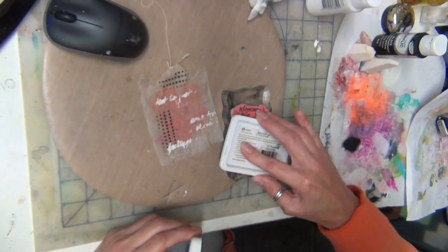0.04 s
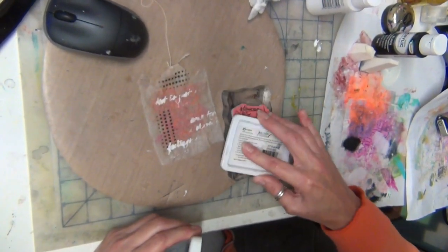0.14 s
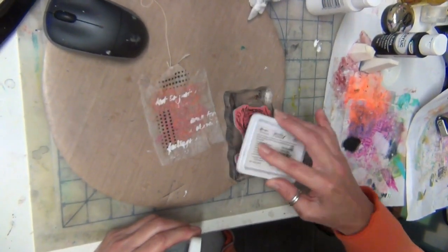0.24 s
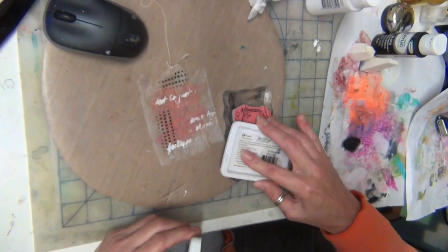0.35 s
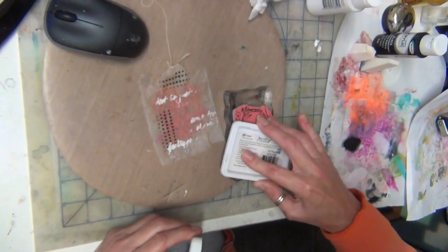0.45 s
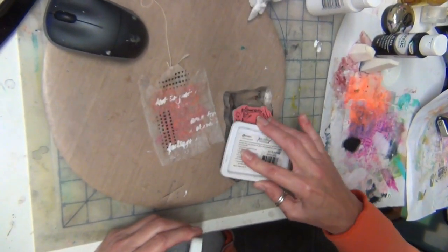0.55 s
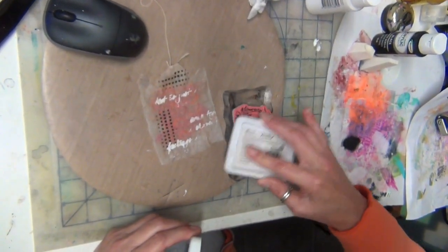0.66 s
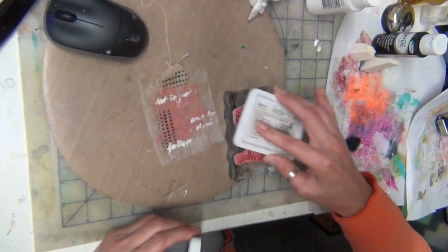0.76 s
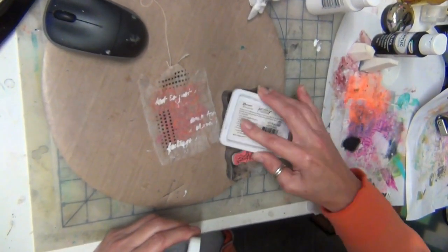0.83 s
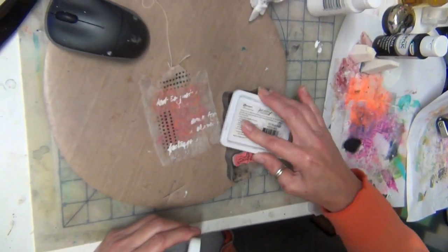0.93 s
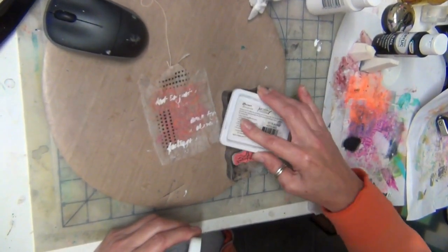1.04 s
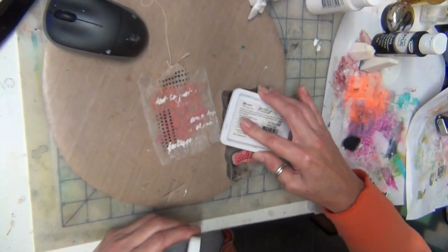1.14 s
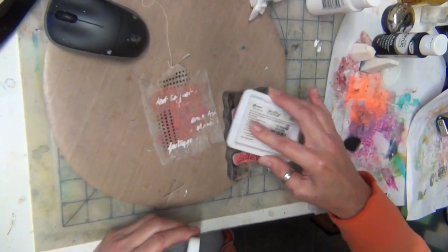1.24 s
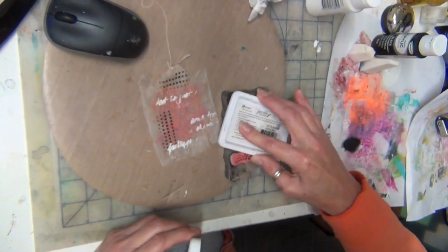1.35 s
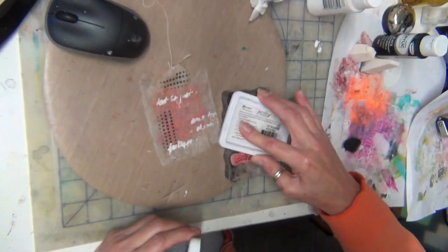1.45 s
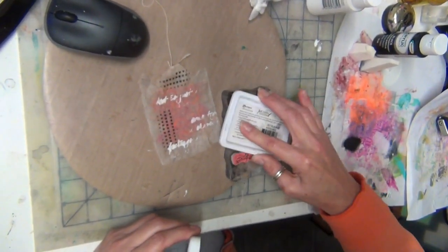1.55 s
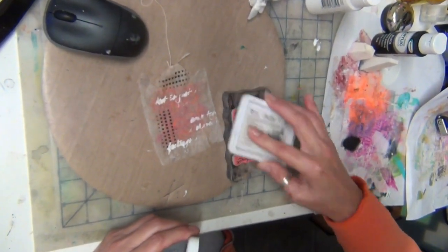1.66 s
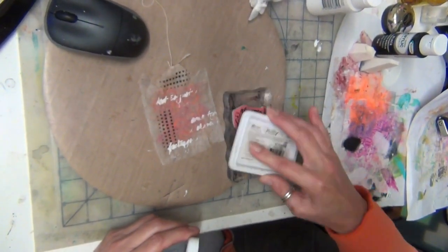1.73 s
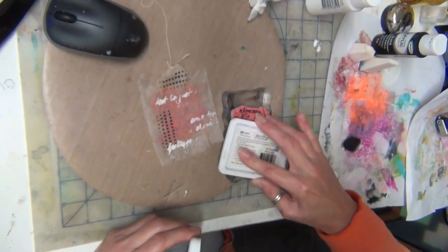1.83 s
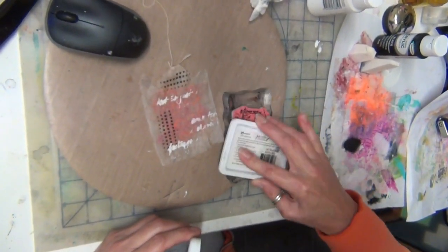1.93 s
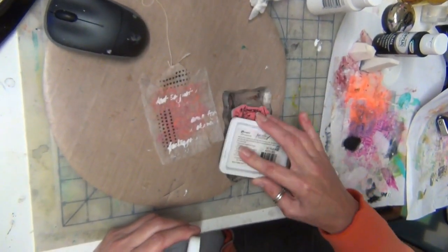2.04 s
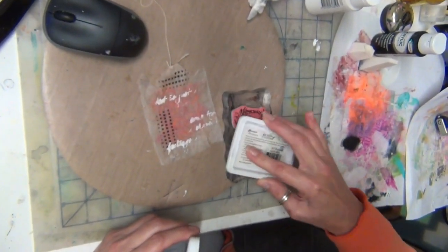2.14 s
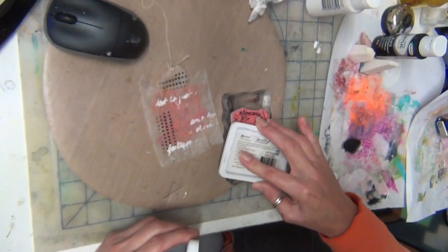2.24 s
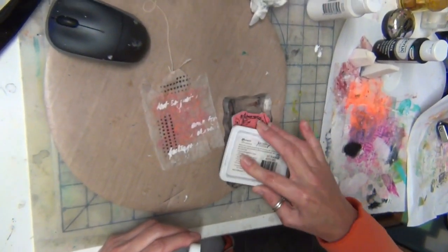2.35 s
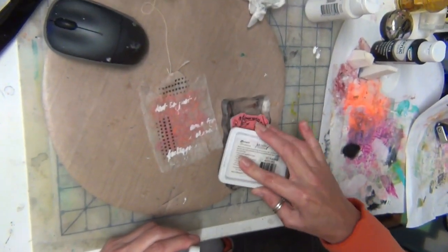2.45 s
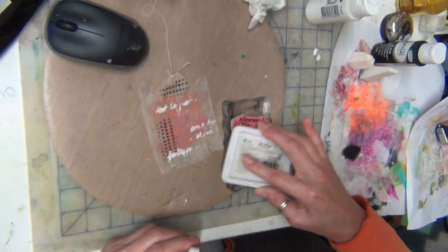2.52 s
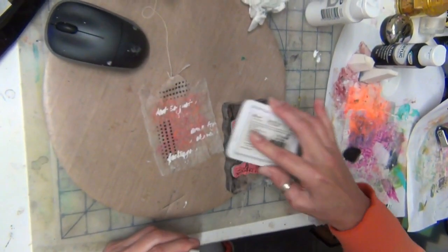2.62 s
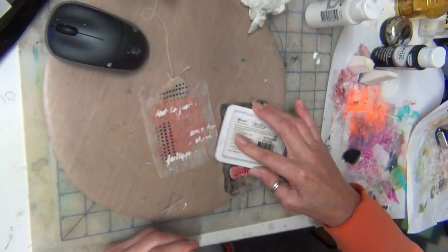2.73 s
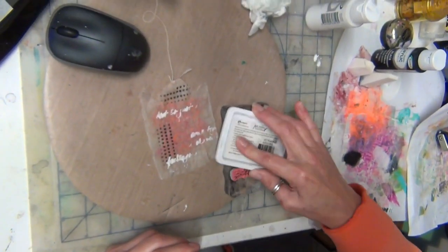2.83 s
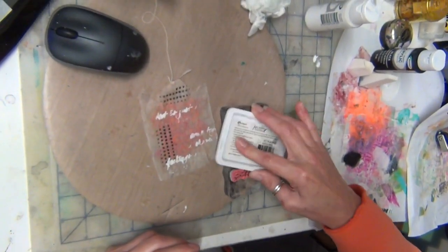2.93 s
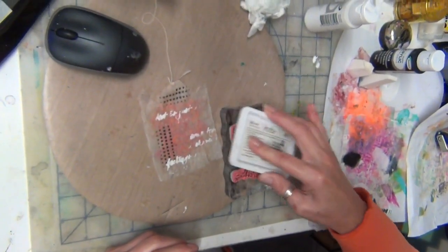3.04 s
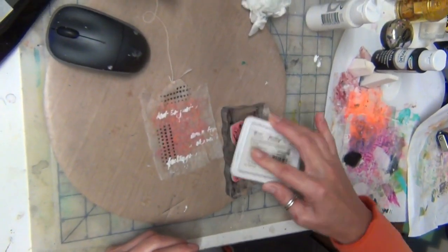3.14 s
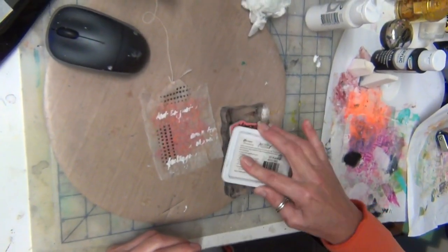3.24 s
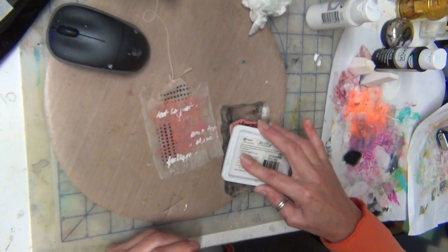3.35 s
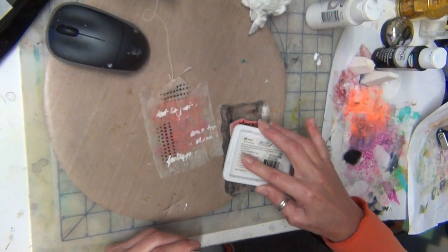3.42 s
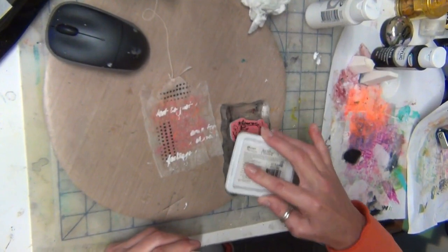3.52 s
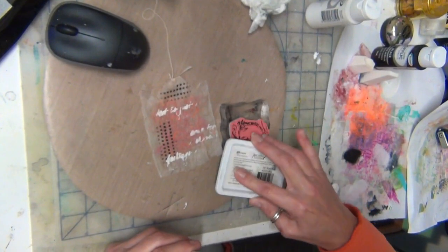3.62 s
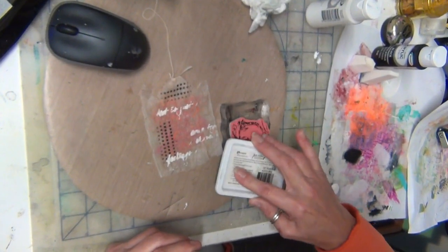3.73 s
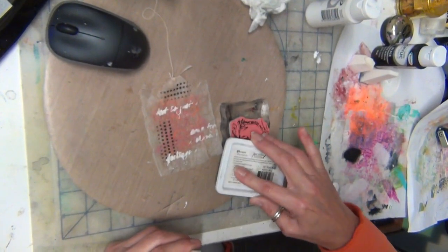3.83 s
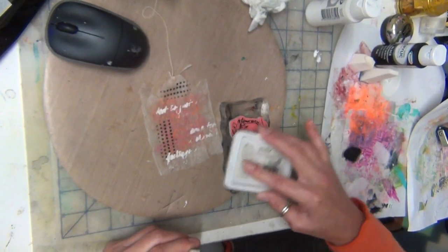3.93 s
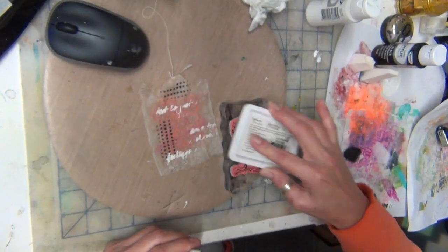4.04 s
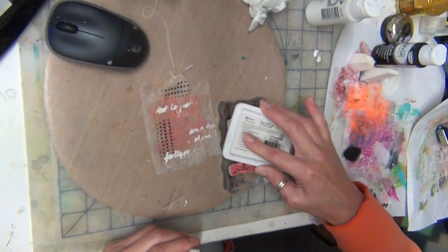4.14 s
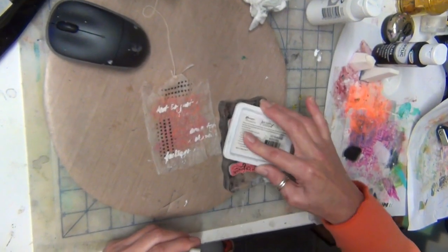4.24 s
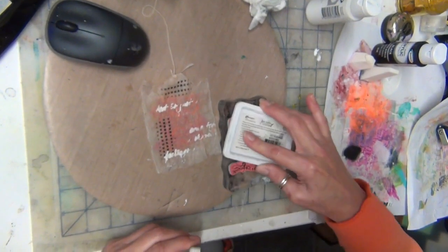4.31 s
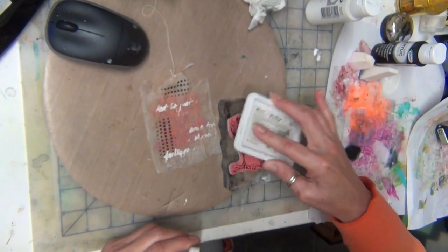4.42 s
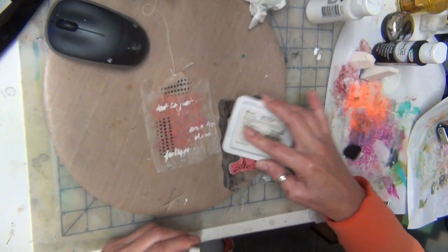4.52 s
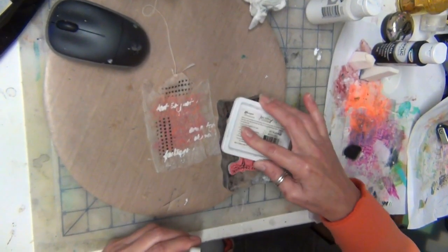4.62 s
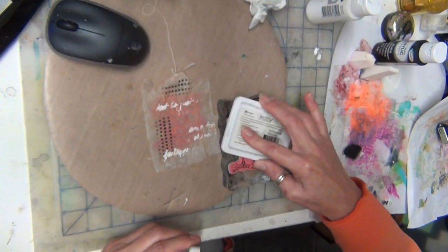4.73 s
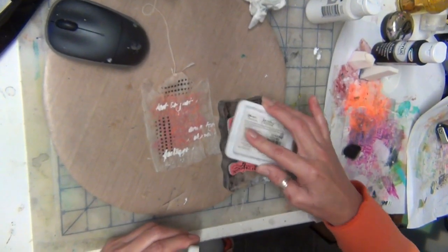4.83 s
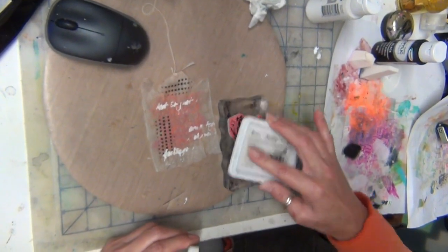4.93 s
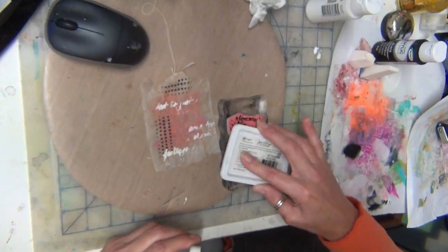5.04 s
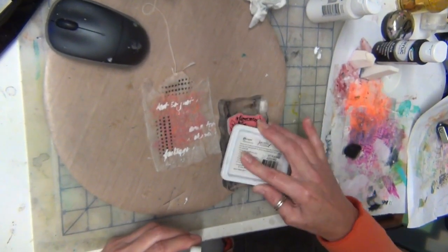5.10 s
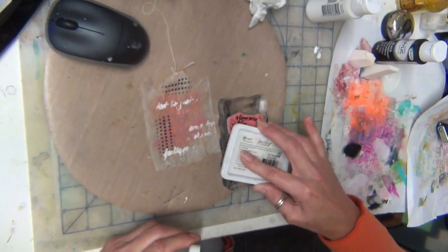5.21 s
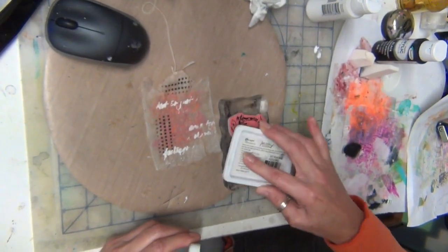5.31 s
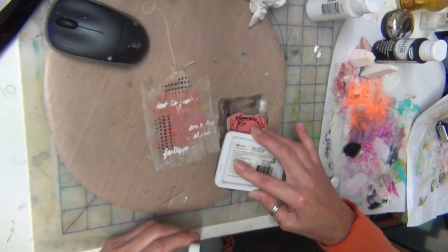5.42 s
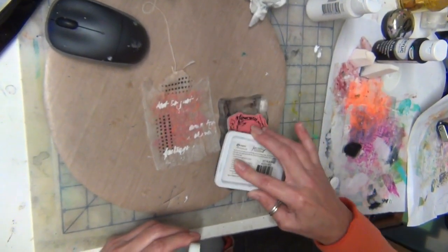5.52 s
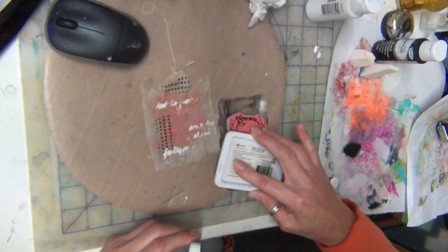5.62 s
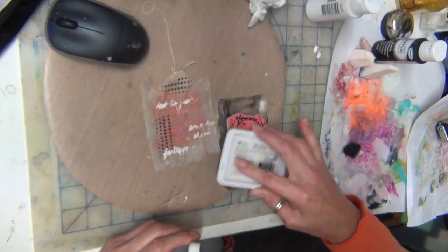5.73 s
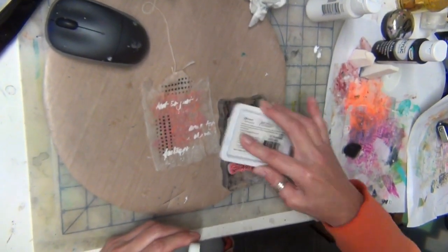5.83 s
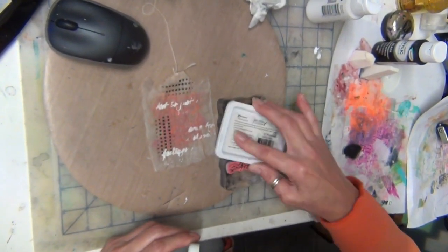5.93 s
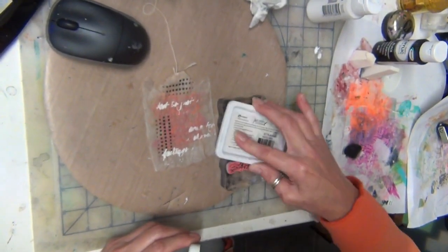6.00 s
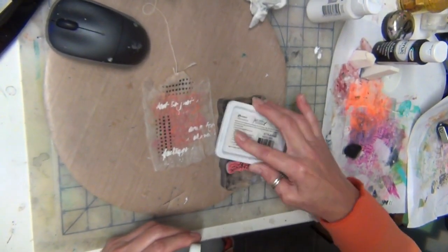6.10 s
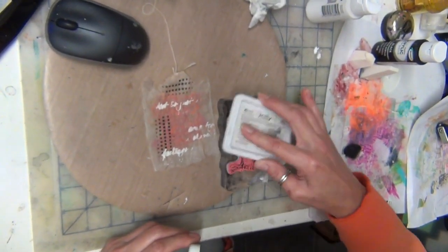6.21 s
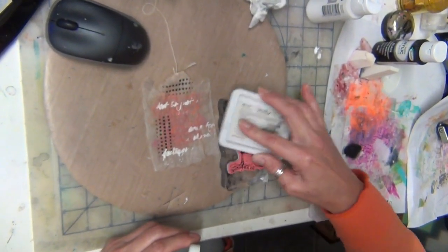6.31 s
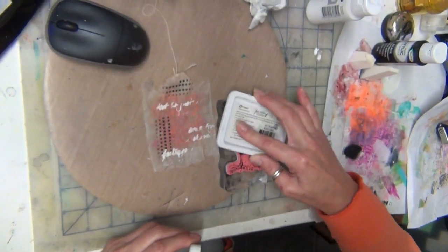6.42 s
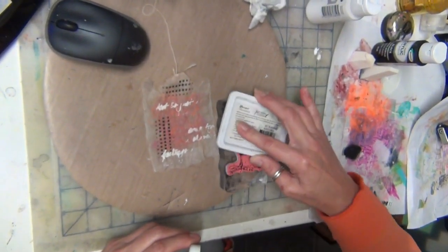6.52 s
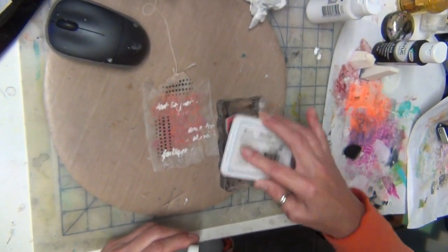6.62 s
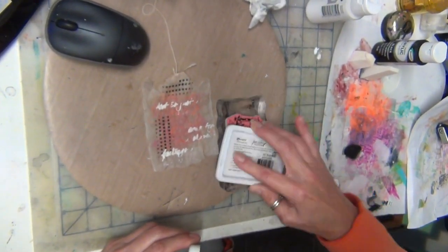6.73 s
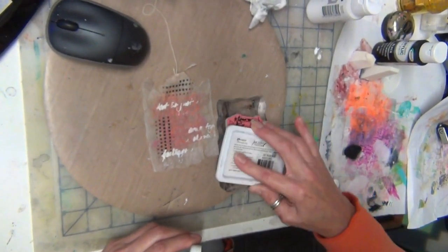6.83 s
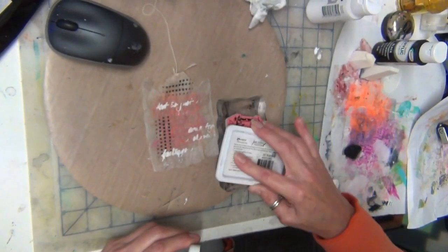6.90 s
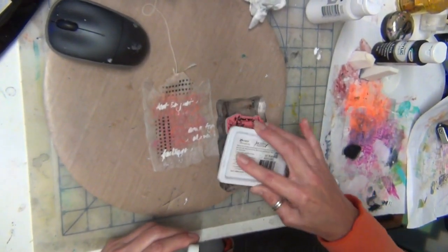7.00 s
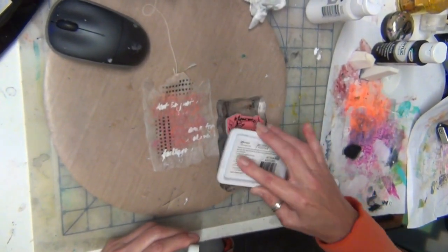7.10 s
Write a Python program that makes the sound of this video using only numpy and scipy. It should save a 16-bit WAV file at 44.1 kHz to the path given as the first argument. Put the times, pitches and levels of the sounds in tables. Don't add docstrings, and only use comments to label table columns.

```python
import sys
import numpy as np
from scipy import signal
from scipy.fft import rfft, irfft, next_fast_len
from scipy.io import wavfile
from scipy.ndimage import uniform_filter1d

SR = 44100
rng = np.random.default_rng(int(sys.argv[2]) if len(sys.argv) > 2 else 0)


def gain_from_db(level_db):
    decades = np.asarray(level_db, float) / 20
    return 10 ** decades


def log_audio(samples):
    frames = np.atleast_2d(samples).T
    limited = np.clip(frames, -1, 1)
    pcm = np.round(limited * 32767).astype(np.int16)
    wavfile.write(sys.argv[1], SR, pcm)


N = 315748
SIZE = next_fast_len(N)
SETTLE_MS = 34

# t/s, table thump/dB, squelch/dB, squelch length/ms, mat thud/dB
DABS = [(0.398, -36.5, -28, 4.7, -39), (0.898, -34.5, -42, 20, -41), (1.373, -31.5, -30.5, 6.3, -40),
        (1.861, -30.5, -28.5, 5.5, -38), (2.287, -30, -29.5, 7.9, -36.5), (2.759, -35, -28.5, 6.1, -31.5),
        (3.264, -32, -32, 12, -38), (3.667, -37, -27.5, 6.9, -34), (4.1431, -33.5, -32.5, 13, -37.5),
        (4.598, -39.5, -32, 8.2, -38.5), (5.073, -31, -23, 7.4, -42), (5.48, -32, -18.5, 2.9, -36),
        (5.943, -32, -38, 6.1, -45), (6.362, -33.5, -51, 9.3, -36.5), (6.787, -39, -36, 7.8, -35.5)]


def ring(modes, seconds):
    t = np.arange(int(seconds * SR))[:, None] / SR
    hz, db, t60 = np.transpose(modes)
    decay = np.exp(-np.log(1000) * t / t60)
    return (gain_from_db(db) * np.sin(2 * np.pi * hz * t) * decay).sum(axis=1)


def add(out, s, sound, db):
    i = int(s * SR)
    out[i:i + len(sound)] += (sound * gain_from_db(db) / np.abs(sound).max())[:N - i]


def band(x, lo_hz, hi_hz):
    edges_hz = [lo_hz, min(hi_hz, SR / 2.2)]
    return signal.sosfilt(signal.butter(2, edges_hz, "band", fs=SR, output="sos"), x)


def colour(x, points):
    hz = np.arange(SIZE // 2 + 1) * SR / SIZE + 1
    point_hz, point_db = np.array(points).T
    gain = gain_from_db(np.interp(np.log(hz), np.log(point_hz), point_db))
    return irfft(rfft(x, SIZE) * gain, SIZE)[..., :N]


def puff(noise, rise_ms, fall_ms):
    ms = np.arange(len(noise)) * 1000 / SR
    return noise * (1 - np.exp(-ms / rise_ms)) * np.exp(-ms / fall_ms)


def push(sound, ms):
    return signal.fftconvolve(sound, np.hanning(int(ms * SR / 1000) + 3))[:len(sound)]


def settle(size, at_ms):
    ms = np.arange(size) * 1000 / SR
    return gain_from_db(-9 / (1 + np.exp((at_ms - ms) / 2.5)))


def hush():
    # f/Hz, level/dB per Hz
    spectrum = [(15, -45), (25, -15), (48, -5), (108, -12), (137, -16.5), (161, -9.5), (309, -14.5),
                (344, -13), (451, -12.5), (624, -11), (677, -12), (962, -10), (1070, -14.5), (1740, -17.5),
                (9000, -31.5), (16000, -32.5)]
    # f/Hz, width/Hz, level/dB
    housing = [(57, 45, 3), (103.2, 12.5, 10), (629, 33, 8.5), (886, 170, 3.5), (1270, 170, 4.5),
               (1750, 326, 8.5), (5000, 1300, -0.5)]
    hz = np.arange(SIZE // 2 + 1) * SR / SIZE
    bumps_db = sum(db / (1 + (2 * (hz - centre) / width) ** 2) for centre, width, db in housing)
    noise = colour(rng.standard_normal((2, N)), spectrum)
    x = irfft(rfft(noise, SIZE) * gain_from_db(bumps_db), SIZE)[:, :N]
    return x * gain_from_db(-60) / x[0].std()


def scan_whine():
    return gain_from_db(-94) * np.sin(2 * np.pi * 15625 * np.arange(N) / SR)


def drum():
    # t/ms, f/Hz, level/dB, t60/s
    ticks = [(7.8, 3000, -64, .006), (7.9, 2500, -63, .018), (8.6, 1630, -60, .022), (7.9, 4760, -76, .02),
             (8.2, 970, -74, .03), (12.5, 1520, -71, .05), (27.8, 3200, -69, .004), (28.5, 1420, -64, .03),
             (28.6, 1720, -67, .04), (28.6, 1240, -72, .05), (35, 1580, -71, .03)]
    # t/ms, length/ms, f/Hz, level/dB
    whines = [(11, 8, 2350, -75), (11, 8.5, 3500, -77), (19, 11, 2450, -66), (19, 12, 4930, -79)]
    turn_hz = 25
    size = SR // turn_hz
    turn = np.zeros(2 * size)
    for ms, hz, db, t60 in ticks:
        add(turn, ms / 1000, push(ring([(hz, 0, t60)], 1 / turn_hz), 0.14), db)
    for ms, length_ms, hz, db in whines:
        i = np.arange(int(length_ms * SR / 1000))
        add(turn, ms / 1000, np.sin(2 * np.pi * hz * i / SR) * np.hanning(len(i)) ** 0.071, db)
    turn = turn[:size] + turn[size:]
    turns = np.arange(N // size + 1)
    gains = (-1.) ** turns * gain_from_db(3.1 * rng.standard_normal(len(turns)))
    return np.outer(gains, turn).ravel()[:N]


def walls(x):
    # t/ms, level/dB
    reflections = [(8.2, -12), (16.2, -28), (19.5, -24), (26.5, -24.5)]
    taps = np.zeros(1500)
    for ms, db in reflections:
        taps[int(ms * SR / 1000)] = gain_from_db(db)
    return band(signal.oaconvolve(x, taps)[:N], 157, 1500)


def echoes(x):
    # f/Hz, level/dB, t60/s
    room = [(159, -29, 0.34), (420, -31, 0.18), (730, -26.5, 0.31), (1500, -18.5, 0.043), (3020, -19, 0.27),
            (5470, -45, 0.16), (10200, -14, 0.24)]
    places, place_s = 5, .2345
    t = np.arange(int(.45 * SR)) / SR
    tails = np.zeros((places, 2, len(t)))
    for hz, db, t60 in room:
        fall = np.exp(-np.log(1000) * t / t60) * np.clip(t / 0.00016, 0, 1)
        noise = band(rng.standard_normal(tails.shape), 0.76 * hz, 2.11 * hz)
        level = gain_from_db(db) / np.sqrt(t60 * SR / 14) * np.sqrt(SR / 2.3 / hz)
        tails += level * noise * fall
    place = (np.arange(N) / SR // place_s) % places
    return sum(signal.oaconvolve((x * (place == k))[None], tail, axes=1)[:, :N]
               for k, tail in enumerate(tails))


def threads():
    # t/s, level/dB, f/Hz
    breaks = [(1.6216, -52, 7800), (3.0294, -71, 6750), (3.482, -59, 6200), (3.5044, -58, 5940),
              (3.7684, -53, 6200), (3.921, -53, 7590), (4.4966, -51, 6500), (5.301, -59, 5000),
              (5.7329, -56, 9400), (5.7484, -61, 7050), (5.7594, -62, 8300), (5.8154, -60, 6720),
              (6.1856, -54, 7770), (6.571, -47.5, 7800), (6.5844, -58, 9730), (7.013, -52, 6700),
              (.636, -59, 6400), (1.174, -53, 7770), (2.1121, -45, 7400), (.1772, -51, 7500),
              (2.5108, -50.5, 3260), (2.542, -59, 9000), (2.545, -59, 7500), (4.8472, -51, 9400),
              (4.8545, -60, 6170), (4.857, -53, 8000)]
    out = np.zeros(N)
    for s, db, hz in breaks:
        noise = rng.standard_normal(300)
        add(out, s, band(puff(noise, 0.24, 0.83), 0.74 * hz, 1.22 * hz), db + .1)
    return out


def peels():
    # t/s, length/ms, level/dB
    crackles = [(1.62, 54, -67), (3.0, 56, -68), (3.468, 53, -64.5), (3.91, 34, -62), (4.479, 30, -70),
                (5.29, 41, -68), (5.71, 130, -65.5), (6.169, 54, -68), (6.566, 56, -65), (6.9, 130, -62.5)]
    out = np.zeros(N)
    for s, ms, db in crackles:
        noise = rng.standard_normal((2, 7000))
        size = min(int(ms * SR / 1000), 7000)
        grains = noise[0] * gain_from_db(60 * uniform_filter1d(noise[1], size=60))
        add(out, s, band(grains, 3300, 10600)[:size] * np.hanning(size) ** .5, db + 10.0)
    return out


def snaps():
    # t/s, level/dB, treble/dB
    releases = [
        (0.187, -36.5, 13.5),
        (0.6568, -37, 12),
        (1.1804, -37.5, 12.5),
        (2.116, -37.5, 9.5),
        (4.8697, -33, 15),
    ]
    # f/Hz, level/dB, t60/s
    case = [(966, -8, 0.07), (1265, -7, 0.022), (1900, -15, 0.02), (2330, -1, 0.014), (3050, -4, 0.011),
            (3950, -8, 0.011), (4404, -14, 0.009), (5308, -16, 0.007), (6546, -15, .007)]
    # f/Hz, level/dB, t60/s
    lip = [(10460, -17, 0.0057), (13000, -14, .006)]
    out = np.zeros(N)
    t = np.arange(500) / SR
    turns = np.cumsum(1050 + 4500 * np.exp(-t / 0.001044)) / SR
    sweep = np.sin(2 * np.pi * turns) + 1.6 * np.sin(2 * np.pi * 1.5 * turns)
    sweep *= (1 - np.exp(-t / 0.00029)) * np.exp(-t / 0.0018)
    for s, db, treble_db in releases:
        noise = rng.standard_normal(700)
        rough = 1 + 0.078 * uniform_filter1d(noise, size=9)[:500]
        add(out, s + .0001, sweep * rough, db - 0.5)
        for hz, mode_db, t60 in case:
            add(out, s + 1.6 / hz, ring([(hz, 0, t60)], .09), db + mode_db - 2.0)
        add(out, s + .0001, band(puff(noise, 0.1, 1.2), 1400, 4600), db - 12)
        add(out, s + .0004, band(ring([(5600, 0, .0016)], .01), 3200, 9400), db + treble_db - 8)
        add(out, s + .0011, ring(lip, .02), db + treble_db - 20)
        add(out, s + .0006, band(puff(noise, 0.3, 2.2), 5500, 13000), db + treble_db - 17)
    return out


def spits():
    # t/s, level/dB, f/Hz
    cracks = [(0.3987, -47, 6500), (0.4018, -46, 6900), (0.4036, -45, 5700), (0.4054, -34, 5900),
              (0.9007, -46, 5700), (0.9023, -44, 6800), (0.9056, -40, 6400), (0.9087, -39.5, 6300),
              (1.3742, -40, 5900), (1.378, -46, 5830), (1.3828, -50, 6400), (1.3933, -41.5, 6500),
              (1.8646, -36, 7200), (1.8679, -31, 6700), (1.87, -41, 6400), (1.8715, -41, 5900),
              (2.2907, -38, 6800), (2.2929, -38, 6800), (2.2972, -39, 6300), (2.2993, -47, 5700),
              (2.7613, -46, 6300), (2.7645, -38, 7100), (2.7669, -34.5, 5500), (2.7692, -34.5, 7000),
              (3.2684, -44, 6700), (3.2706, -46, 5600), (3.2723, -34.5, 5160), (3.2765, -45, 6400),
              (3.6669, -43, 7400), (3.6697, -34.5, 7000), (3.6717, -41, 6700), (3.6758, -39, 5700),
              (4.1437, -45, 5500), (4.1456, -44, 6400), (4.1502, -48, 6800), (4.1518, -38, 6000),
              (4.6006, -42, 5800), (4.6071, -40, 7600), (4.6089, -34, 6100), (4.6109, -39, 7400),
              (5.0766, -46, 6300), (5.078, -47, 7100), (5.0794, -28.5, 6250), (5.0834, -45, 5800),
              (5.4817, -33, 7900), (5.4835, -37, 8000), (5.4868, -42, 5600), (5.4891, -32, 5700),
              (5.9477, -38, 8200), (5.9501, -45, 6300), (5.9522, -34, 6140), (5.9555, -42, 6300),
              (6.3666, -48, 6400), (6.3693, -41, 6400), (6.3718, -38, 8200), (6.3748, -36.5, 7550),
              (6.7884, -36, 7200), (6.7912, -41, 6400), (6.7933, -41, 5800), (6.7983, -45, 5800)]
    out = np.zeros(N)
    for s, db, hz in cracks:
        noise = rng.standard_normal((2, 500))
        add(out, s, band(puff(noise[0], 0.059, 0.91), 0.52 * hz, 1.37 * hz), db + 2.0)
        add(out, s, band(puff(noise[1], 0.05, 0.51), 9400, 16000), db - 24)
    return out


def late_bursts():
    # t/s, level/dB, f/Hz
    knocks = [(0.422, -47, 408), (0.922, -35.5, 420), (1.392, -43, 385), (1.89, -39, 405),
              (2.7823, -25, 400), (2.791, -32.5, 390), (3.287, -37, 400), (3.298, -45, 390),
              (4.165, -57, 513), (4.619, -24.5, 382), (5.509, -31.5, 252), (5.967, -29.5, 390),
              (5.975, -39, 390), (6.3855, -32.5, 373), (6.3911, -26, 398), (6.7912, -26, 420),
              (6.8092, -45, 390), (6.8138, -44, 390), (1.41, -37, 390), (4.172, -41, 420),
              (0.4283, -38, 326), (2.311, -38, 403), (5.096, -30.5, 395), (5.502, -42, 488),
              (3.696, -43, 225)]
    # t/s, level/dB
    nudges = [(2.513, -49)]
    out = np.zeros(N)
    for s, db, hz in knocks:
        block = ring([(hz, 0, .05), (1.265 * hz, -9, .03), (2.14 * hz, -8, .03)], .08)
        add(out, s, push(block, 1.16) * settle(len(block), 21), db)
    for s, db in nudges:
        add(out, s, push(ring([(390, 4, 0.044), (295, -15, 0.028)], .1), 0.73), db)
    return out


def board():
    # f/Hz, level/dB, t60/s
    mode_families = [
        [(197, 15.5, 0.044), (218.5, 10, 0.12), (252, 18.5, 0.062), (281, 9, 0.038)],
        [(356.5, 10.5, 0.92), (348, -0.5, 2)],
        [(379.7, 13.5, 0.2), (334.4, 1, 0.16), (491.7, 6, 0.14)],
        [(427.6, 10.5, 0.065), (401.5, 13, 0.14), (544, 2.5, 0.13)],
        [(595.5, 8, 0.2), (571, 7, 0.2), (655, 13, 0.089), (677, 2, 0.12), (790, -21, 0.048), (987, 5, 0.05)],
    ]
    # t/s, board/dB, table top/dB, board edge/dB, stamp block/dB
    landings = [(.399, -55, -82, -63, -50.5), (0.902, -48.5, -67, -55.5, -48),
                (1.375, -45, -63.5, -47, -64), (1.865, -63, -73, -70, -51), (2.291, -68, -73, -54, -59.5),
                (2.761, -37, -55, -42.5, -60), (3.272, -52.5, -72, -63, -72), (3.67, -56, -70, -57, -54),
                (4.147, -45.5, -64.5, -49.5, -66), (4.602, -43.5, -59.5, -36, -46),
                (5.074, -47, -72, -74, -73), (5.482, -52, -74, -74, -49), (5.946, -52, -63, -46.5, -56),
                (6.366, -42, -59, -48, -58), (6.788, -49.5, -67, -52, -71)]
    out = np.zeros(N)
    swell = 1 - np.exp(-np.arange(int(.7 * SR)) / SR / 0.0023)
    families = [ring(modes, .7) * swell for modes in mode_families]
    for k in (0, 2, 3, 4):
        families[k] *= settle(len(swell), SETTLE_MS)
    for (s, ring_db, top_db, edge_db, block_db), dab in zip(landings, DABS):
        low_db = -56 + 0.58 * (dab[4] + 40)
        levels_db = low_db, top_db, ring_db, block_db, edge_db
        sound = sum(gain_from_db(db) * family for db, family in zip(levels_db, families))
        i = int(s * SR)
        out[i:i + len(sound)] += sound[:N - i]
    return out


def dabs():
    # f/Hz, level/dB, t60/s
    table = [(71, 2, 0.021), (97, 1, 0.088), (146, 5, 0.059)]
    # f/Hz, level/dB, t60/s
    mat = [(167.5, 5, 0.087), (235.7, -4.5, 0.091)]
    out = np.zeros(N)
    t_ms = np.arange(2600) * 1000 / SR
    thump = push(ring(table, .2), 4.3)
    thud = push(ring(mat, .12), 2.57) * settle(int(.12 * SR), SETTLE_MS)
    for s, thump_db, wet_db, length_ms, thud_db in DABS:
        add(out, s + 0.0044, thump, thump_db - .1)
        add(out, s + 0.00404, thud, thud_db)
        noise = rng.standard_normal((2, 2600))
        press = np.clip(t_ms / 3, 0, 1) * np.exp(-np.maximum(t_ms - length_ms, 0) / 5)
        grains = noise[0] * gain_from_db(14 * uniform_filter1d(noise[1], size=16))
        add(out, s, band(grains, 910, 4970) * press, wet_db - 3)
    return out


def corners():
    # t/s, case click/dB, block knock/dB, case f/Hz, knock f/Hz
    blows = [(0.4059, -29, -32, 2340, 490), (0.9027, -25, -18, 1410, 472), (1.3753, -29, -26, 2140, 420),
             (1.8674, -26, -33, 1500, 507), (2.2976, -30, -28.5, 2220, 540), (2.7673, -32, -22, 1510, 455),
             (3.271, -26, -18, 1480, 439), (3.6727, -43, -32, 1740, 483), (4.1456, -21.5, -12.5, 1020, 627),
             (4.6022, -25.5, -18, 1920, 450), (5.0778, -26, -24.5, 1980, 470),
             (5.4809, -19, -51, 1500, 490), (5.9456, -24, -25.5, 1530, 397),
             (6.3663, -24.5, -14, 1620, 450), (6.7878, -22.5, -41, 1070, 420)]
    rolls = [(0.3992, -28.5, -39, 1500, 418), (.4065, -29.5, -55, 1300, 430), (0.4073, -32, -52, 2120, 433),
             (0.9067, -30, -55, 1210, 460), (0.9085, -27, -57, 1850, 470), (1.3794, -44, -33, 2260, 433),
             (1.384, -32, -23, 1420, 420), (1.3919, -36, -35, 2130, 447), (1.8645, -21, -53, 1480, 490),
             (1.8714, -25, -28.5, 1980, 540), (2.291, -22.5, -37, 1540, 510),
             (2.7607, -23.5, -19.5, 2060, 410), (2.7643, -21.5, -36, 1300, 440),
             (2.7687, -24, -14.5, 1850, 455), (2.771, -22.5, -29, 1370, 815), (3.2742, -29, -55, 1790, 420),
             (3.67, -19, -56, 1975, 450), (3.676, -23, -34, 1840, 494), (3.686, -41, -39, 1940, 503),
             (4.1543, -26, -32, 1920, 420), (4.1487, -21, -36, 1060, 600), (5.0793, -22.5, -45, 2190, 470),
             (0.402, -39, -34, 1500, 444), (5.4837, -24, -33, 1680, 428), (4.16, -41, -37, 1300, 654),
             (4.6058, -23.5, -21.5, 1460, 527), (4.61, -27, -27.5, 1500, 420),
             (3.2672, -24, -36, 1040, 670), (5.0749, -23, -38, 1800, 466), (5.082, -23, -59, 1780, 487),
             (5.488, -24, -33, 1330, 506), (5.4889, -24, -61, 1380, 510), (5.494, -19, -34, 1500, 533),
             (5.951, -28, -22, 1460, 413), (5.9534, -40, -28.5, 2040, 440), (5.9556, -28, -34, 2000, 442),
             (6.369, -31, -16, 1330, 463), (6.375, -39, -26, 2230, 512), (6.3778, -27.5, -23, 1270, 527),
             (6.797, -30.5, -48, 2060, 420)]
    # t/s, case click/dB, block knock/dB
    touches = [(0.8998, -40, -25), (1.3726, -57, -30), (2.2885, -25, -25.5), (2.7596, -36, -19),
               (3.2632, -39, -51), (3.2655, -33, -24.5), (3.667, -42, -32), (4.1448, -29, -27.5),
               (4.5994, -32, -30), (5.943, -34, -27), (6.3645, -32, -21.5), (6.7846, -38, -47)]
    touch_hz = 1970
    table = np.array(blows)
    light = []
    for row in touches:
        nearest = np.abs(table[:, 0] - row[0]).argmin()
        light.append((*row, touch_hz, table[nearest, 4]))
    return blows + rolls + light


def contacts():
    out = np.zeros(N)
    for s, click_db, knock_db, hz, low_hz in corners():
        noise = rng.standard_normal(900)
        case = ring([(hz, 0, .008), (1.43 * hz, -10, .007), (0.866 * hz, -12, .012), (2.01 * hz, -14, .005)], .03)
        add(out, s - .0002, puff(push(case, 0.19), 1.0, 30), click_db - 4.5)
        add(out, s, band(puff(noise, 0.28, 3.04), 1060, 2760), click_db - 7.5)
        block = ring([(low_hz, 0, .02), (1.49 * low_hz, -6, .016), (2.1 * low_hz, -9, .014)], .06)
        add(out, s + 0.00028, band(push(block, 0.99), 0.54 * low_hz, 5500), knock_db - 3.5)
    return out


def scene():
    # f/Hz, level/dB
    width = [(60, -25), (110, -68), (200, -23.5), (380, -16.5), (700, -15), (1290, -6), (2380, -6),
             (4400, -7), (8120, -9.5), (15000, -13)]
    knocks = band(contacts(), 59, 20000)
    ink = snaps() + threads() + peels() + spits()
    near = knocks + band(board() + dabs() + late_bursts() + ink, 78, 20000)
    wet, air, ticks = echoes(near), hush(), drum()
    mid = near + walls(knocks) + wet[0] + air[0] + ticks + scan_whine()
    side = gain_from_db(-5) * wet[1] + air[1] + gain_from_db(-18.0) * np.roll(ticks, 9)
    side += gain_from_db(-6.5) * band(np.roll(near, 14), 4100, 15000)
    side += gain_from_db(-6.0) * band(np.roll(near, 200), 570, 860)
    side = colour(side, width)
    return np.array([mid + side, mid - side])


def low_pass(x):
    return signal.sosfilt(signal.butter(12, 16650, fs=SR, output="sos"), x)


def record(dry):
    cut = signal.sosfilt(signal.ellip(10, .2, 30, 15800, fs=SR, output="sos"), dry)
    return low_pass(cut)


dry = scene()
out = record(dry)
log_audio(out)
```